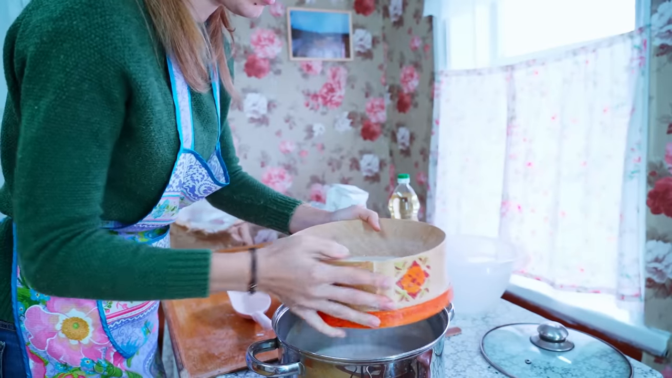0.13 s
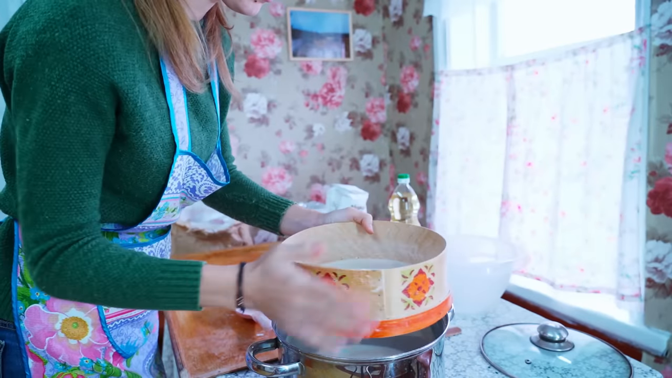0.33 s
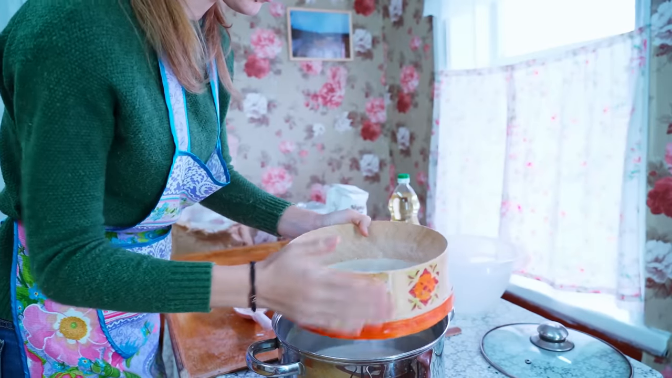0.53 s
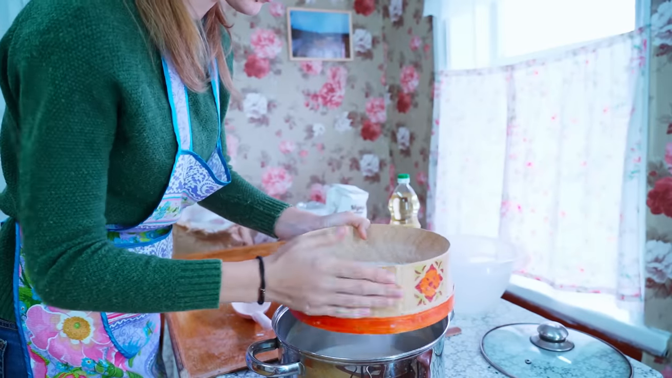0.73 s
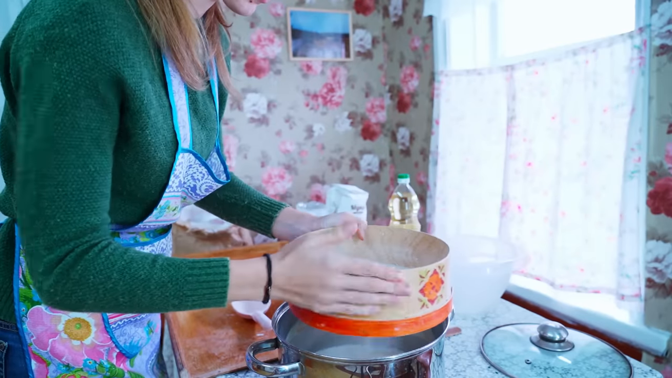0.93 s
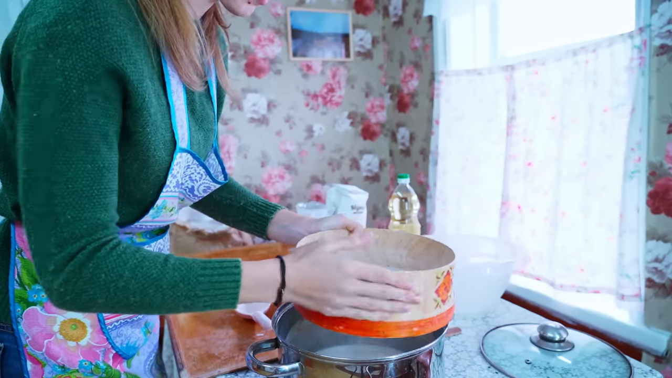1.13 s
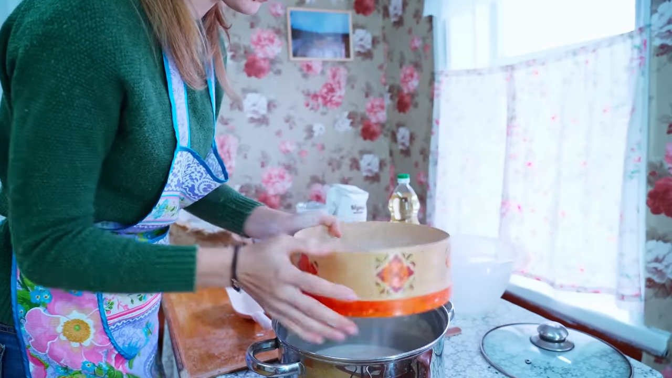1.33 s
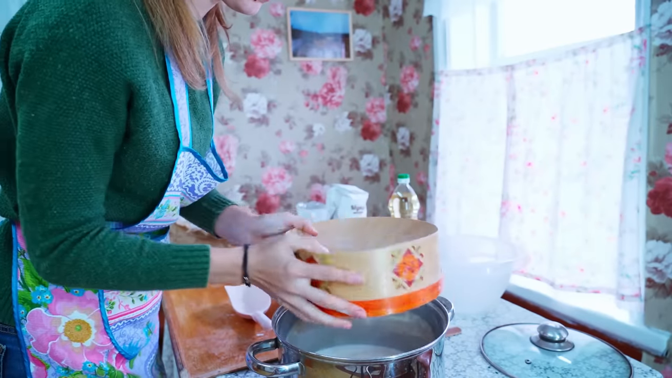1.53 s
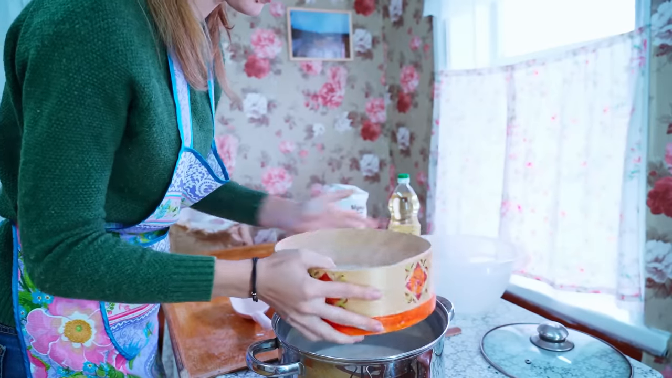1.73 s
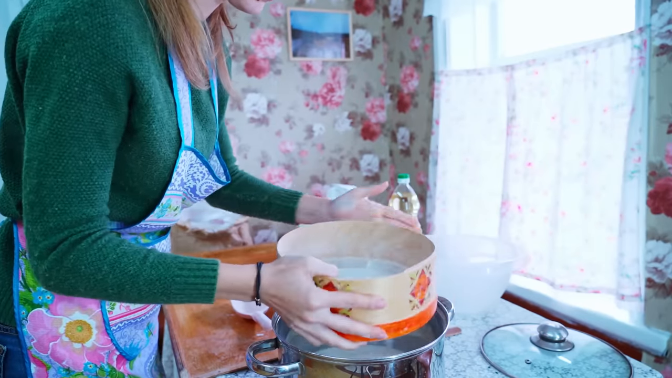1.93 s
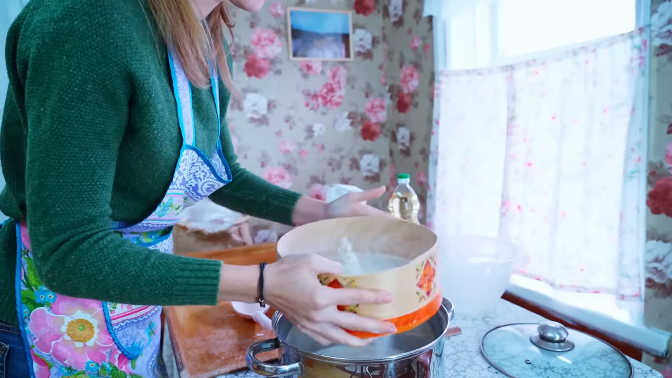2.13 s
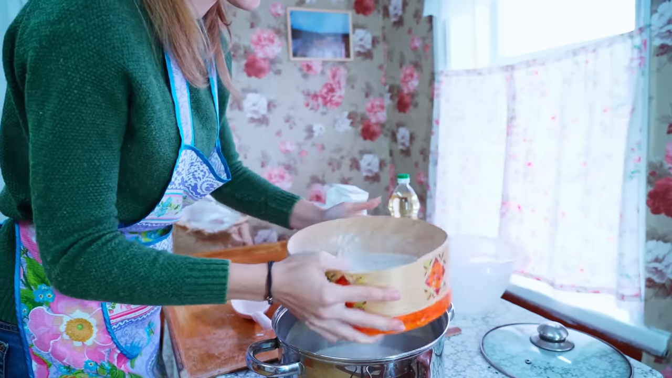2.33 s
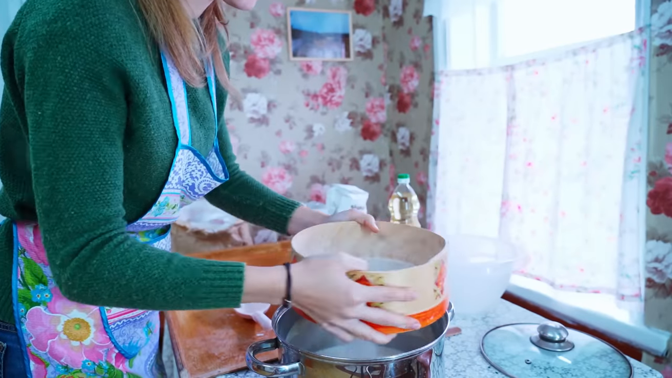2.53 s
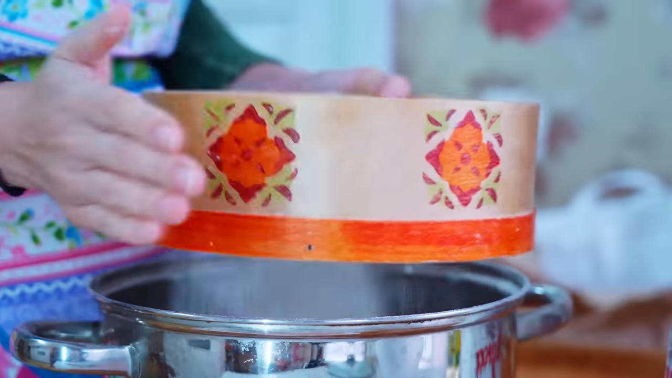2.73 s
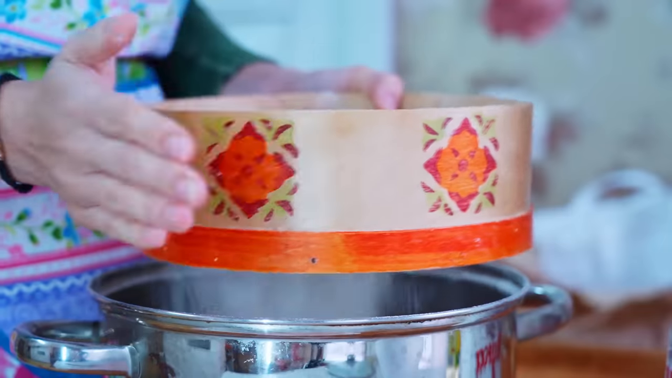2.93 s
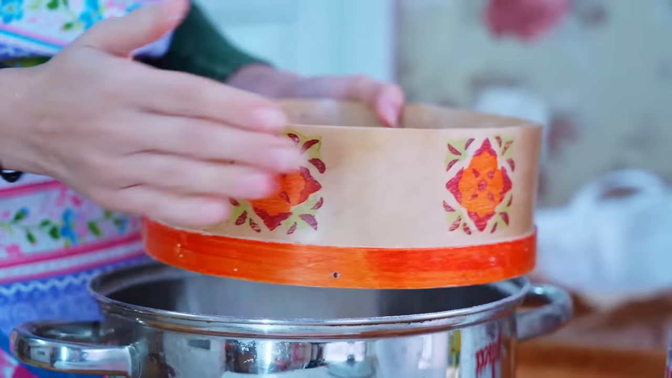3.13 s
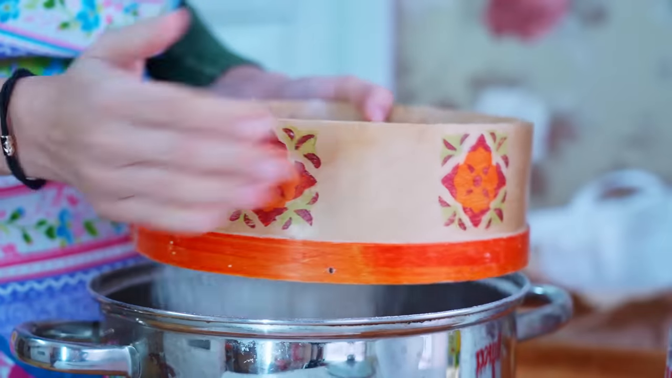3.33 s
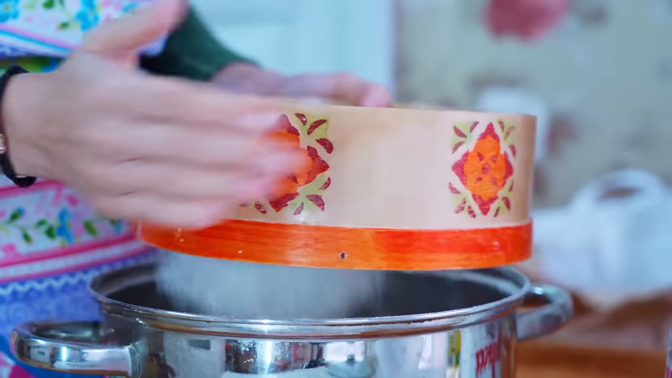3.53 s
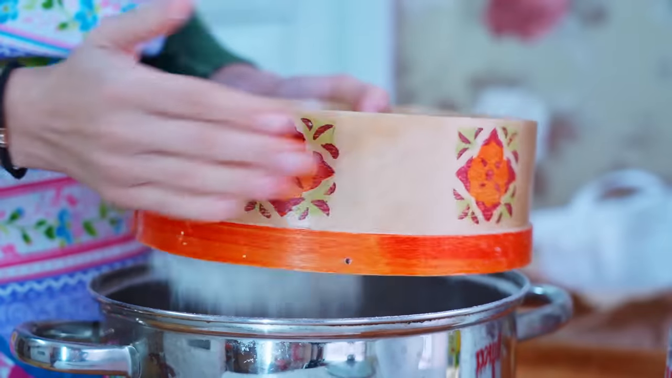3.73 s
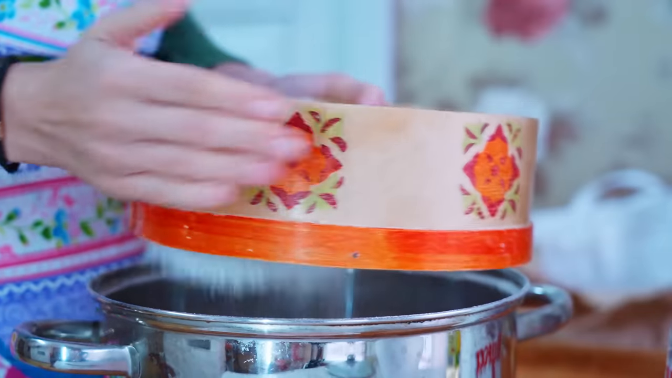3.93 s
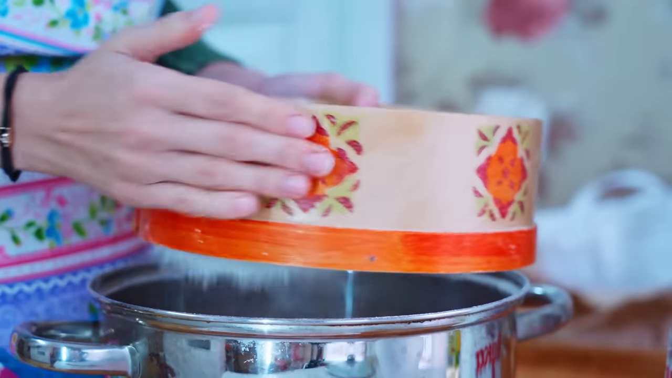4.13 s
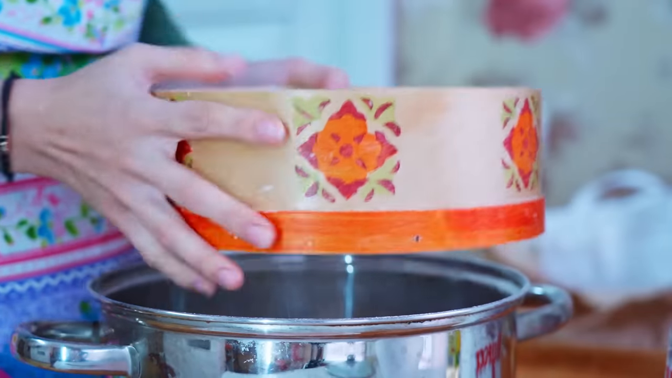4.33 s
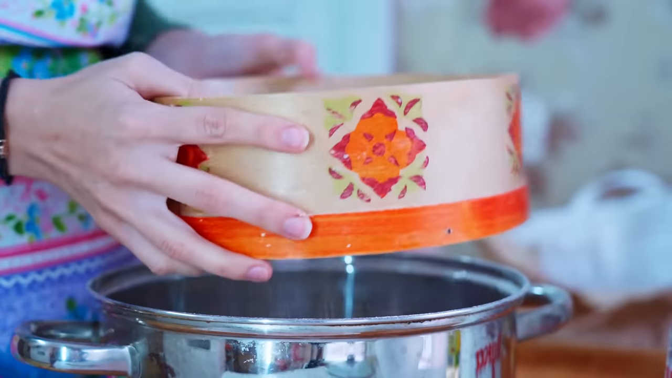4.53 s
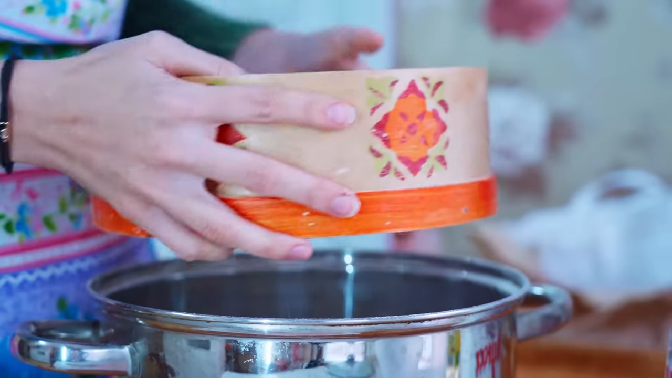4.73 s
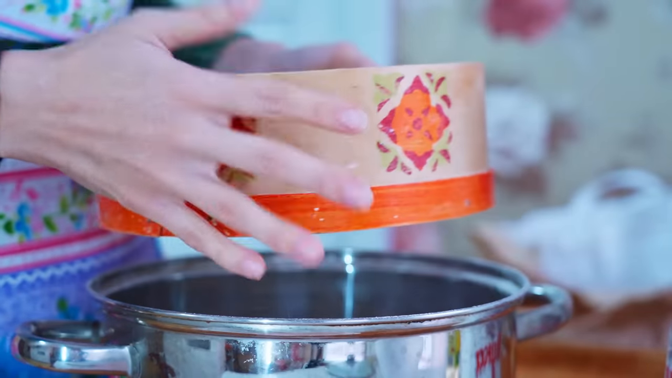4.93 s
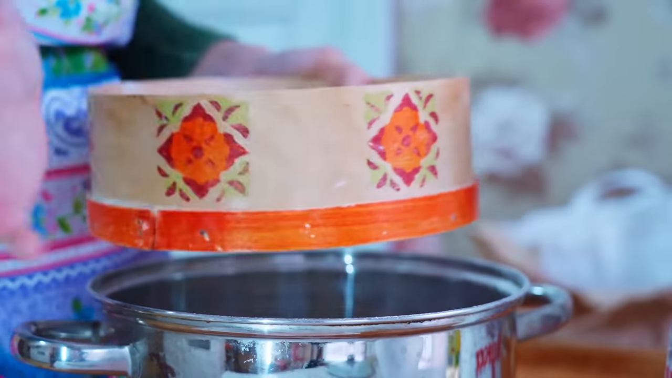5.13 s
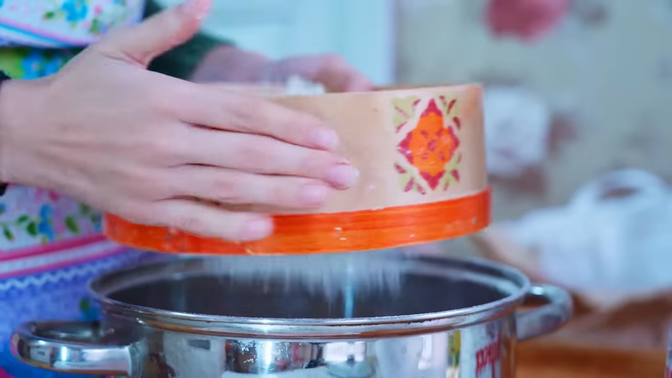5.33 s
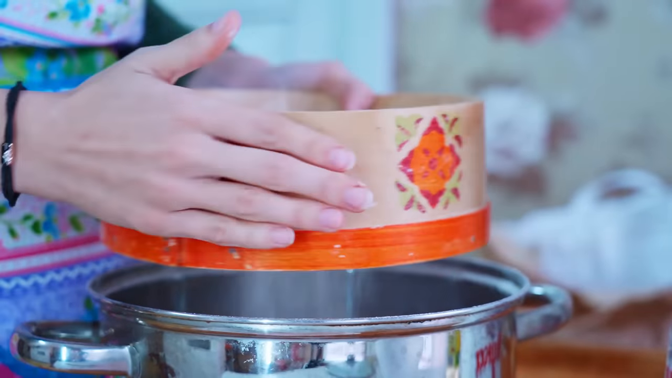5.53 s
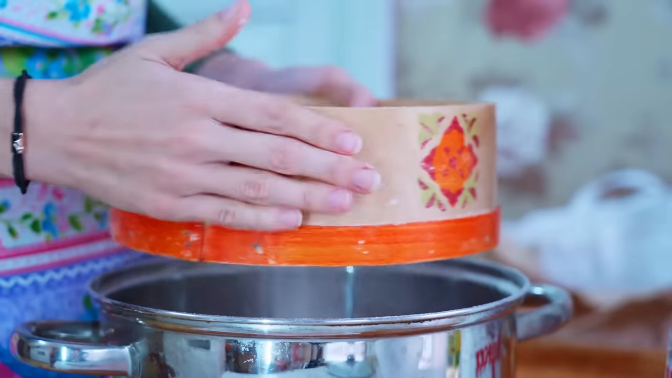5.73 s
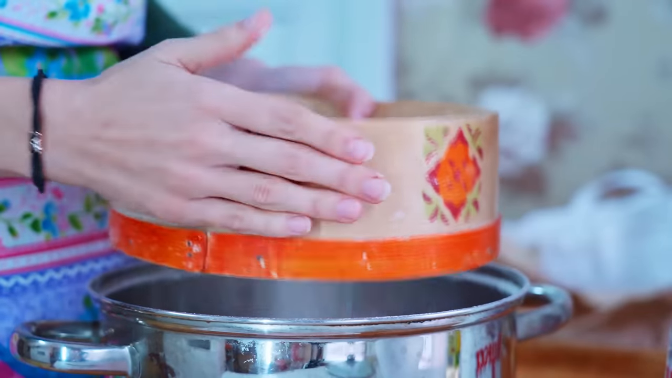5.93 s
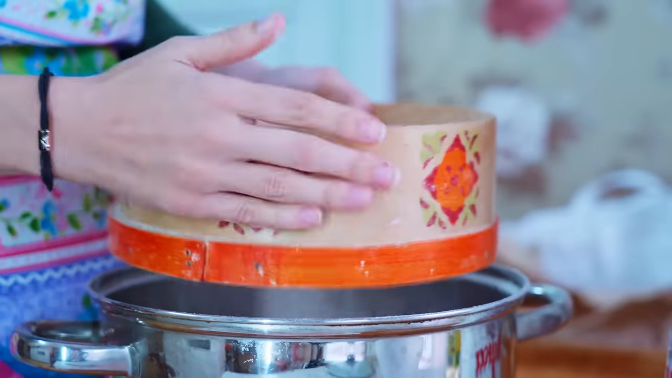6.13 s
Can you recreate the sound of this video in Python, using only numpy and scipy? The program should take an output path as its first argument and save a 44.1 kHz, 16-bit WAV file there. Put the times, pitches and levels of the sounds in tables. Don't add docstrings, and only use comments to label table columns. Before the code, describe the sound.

A small quiet kitchen, heard close in stereo over a low, steady room floor. At 0 s there is a very faint touch and a brush of skin on wood. From 0.4 to 1.15 s five brisk pats land on the sieve's wooden hoop, evenly spaced just under 0.2 s apart. Each is a clappy pop of air with a bright skin crack, a small thud of hoop and mesh, and a short room ring. From 1.4 to 1.75 s hands slide with a dry rub. Pats resume at 1.87 s, soft and smeared at first, then firm and regular until 4.1 s, with little ticks among them. A barely audible touch follows at 4.4 s; until 5.2 s come faint slides, fine flour hiss, soft mesh thumps and nail ticks. At 5.3 s one hard, crisp slap starts a last run of five pats, ending near 6.2 s.

```python
import sys
import numpy as np
from scipy import signal
from scipy.fft import rfft, irfft, next_fast_len
from scipy.io import wavfile

SR = 44100
rng = np.random.default_rng(int(sys.argv[2]) if len(sys.argv) > 2 else 0)


def makeup_ratio(level_db):
    decades = np.asarray(level_db, float) / 20
    return 10 ** decades


def digitize_waveform(pressure):
    field = np.atleast_2d(pressure).T
    bounded = np.clip(field, -1, 1)
    quanta = np.round(bounded * 32767).astype(np.int16)
    wavfile.write(sys.argv[1], SR, quanta)


N = 272538


# start in seconds, force in dB, landing time in ms,
# air pocket between the fingers in dB re force, hollow of the palm in dB re force.
PATS = [(0.0314, -34, 9.4, 7, -3), (0.4099, -17, 2.3, 4.5, -10), (0.5968, -15.5, 2.2, 2, -4.5),
        (0.77, -15, 3, 7, 2.5), (0.9505, -12.5, 3.7, 2.5, -4), (1.137, -14, 2.6, 3, -8),
        (1.8728, -22.5, 13, 3, -6), (2.0468, -18.5, 14, 1.5, -8), (2.2181, -15, 5.9, 1.5, -7),
        (2.3916, -15.5, 3.2, 1.5, -11), (2.636, -15, 2.5, 5.5, -18), (2.8414, -14.5, 0.8, 4.5, -14),
        (3.0454, -15, 5.7, 6, -4.5), (3.2674, -15, 3.5, 3, -8), (3.4676, -15.5, 9.3, 4.5, -9.5),
        (3.6812, -13, 7.4, 3.5, -3.5), (3.8903, -13, 6.9, 0.4, -1.5), (4.1084, -15.5, 4.8, 6, -6.5),
        (4.3743, -35, 2.9, 6, -8), (5.3055, -11, 1.3, 1.5, -7), (5.5363, -17.5, 6.1, 3.5, -9.5),
        (5.743, -15.5, 12.4, 1.5, -2.5), (5.959, -17, 7.7, 3, -6), (6.1673, -15, 4, 6, -3)]
PAT_S = np.array(PATS)[:, 0]


def slaps():
    near, around = np.zeros((2, N)), np.zeros(N)
    t = np.arange(1024) / SR
    click = 1. * (t == 0)
    shared, own = rng.standard_normal((2, len(PATS), 2, 1024))
    sizes = makeup_ratio(1.68 * rng.exponential(1, (len(PATS), 1024)))
    pockets = held(PAT_S)[:, 1] * (1 + 0.03 * rng.uniform(-1, 1, len(PATS)))
    for pat, pocket_hz, common, sides, size in zip(PATS, pockets, shared, own, sizes):
        start_s, landing_ms = pat[0], max(pat[2], .5)
        landing = (1 - np.exp(-t / 0.000078)) * np.exp(-(1000 * t / landing_ms) ** 2)
        contacts = landing * size * (common[0] + .6 * sides)
        add(near, start_s - .0003, sum(slap_parts(contacts, pat, pocket_hz)))
        power = sum(np.abs(rfft(part)) ** 2 for part in slap_parts(click, pat, pocket_hz))
        pulse = np.roll(irfft(np.sqrt(power)), 96)[:192]
        add(around, start_s - .0005, pulse)
    straight_db = -0.2
    return makeup_ratio(straight_db) * band_pass(near, 800, 16000), around


def slap_parts(contact, pat, pocket_hz):
    _, force_db, _, pocket_db, palm_db = pat
    pocket = ring(ring(contact, pocket_hz, .0021), pocket_hz, .0021)
    palm = ring(ring(contact, 1420, .006), 1420, .006)
    knock = band_pass(contact, 2600, 4800)
    airy_top = high_pass(contact, 8600)
    crack = band_pass(contact, 4600, 8000) - .13 * airy_top
    levels = force_db + np.array([pocket_db - 1.6, palm_db + 0.6, 1.1, -0.5])
    parts = []
    for db, part in zip(levels, [pocket, palm, knock, crack]):
        energy = np.sum(part ** 2, axis=-1, keepdims=True)
        parts.append(makeup_ratio(db) * part / np.sqrt(energy / 60))
    return parts


# from when in seconds, air pocket in Hz, mesh in dB re force,
# hoop in dB re force, hoop under the grip in Hz.
GRIPS = [(0, 2880, -1.5, 1.5, 300), (0.3, 2050, -3, -6, 480), (0.5, 2650, -8, -8, 480),
         (0.7, 2100, -12, -14, 400), (1.8, 2450, -10, -11, 400), (2.6, 2300, -14, -17, 410),
         (2.8, 2250, -22, -12, 630), (3.2, 2150, -17, -9, 490), (3.4, 2200, -26, -10, 600),
         (3.6, 2190, -24, -8.5, 415), (4.0, 2450, -17, -7, 597), (4.3, 2450, -7, -10, 380),
         (5.2, 2340, -17, -13, 410), (5.5, 2050, -10, -11, 420), (5.9, 2050, -11, -3, 415),
         (6.1, 2500, -16, -6, 436)]


def held(at_s):
    grips = np.array(GRIPS)
    return grips[np.searchsorted(grips[:, 0], at_s) - 1]


# start in seconds, level in dB.
DROPS = [
    (4.257, -39),
    (4.745, -50.5),
    (5.448, -38),
    (5.689, -37),
]
# frequency in Hz, level in dB, 60 dB decay in seconds.
MESH = [(147, -8, .14), (174, -3, .13), (205, -1.5, .07)]
HEAP = [(162, -1.5, .11)]
HOOP = [(270, -4, 0.04), (388, -11, 0.056), (605, -12, 0.019), (817, -5, 0.05)]


def thuds():
    s = PAT_S + .0004
    force_db = np.array(PATS)[:, 1]
    _, _, mesh_db, hoop_db, grip_hz = held(s).T
    mesh = struck(s, force_db + mesh_db, MESH) + struck(*np.transpose(DROPS), HEAP)
    hoop = struck(s, force_db + hoop_db, HOOP)
    click = 1. * (np.arange(8192) == 0)
    for at_s, db, hz in zip(s, force_db + hoop_db, grip_hz):
        add(hoop, at_s + 0.00214, makeup_ratio(db + 4.5) * ring(click, hz, t60=0.036))
    hoop = high_pass(hoop, 210)
    return band_pass(mesh + hoop, 90, 1100)


def struck(at_s, db, modes):
    out = np.zeros(N)
    for hz, mode_db, t60 in modes:
        clicks = np.zeros(N)
        strength_db = db + mode_db + rng.normal(0, 1.2, len(at_s))
        clicks[(at_s * SR).astype(int)] = -makeup_ratio(strength_db)
        out += ring(clicks, hz, t60)
    return out


def boom():
    hz, t60 = 76, .13
    s, force_db, landing_ms = np.array(PATS).T[:3]
    db = force_db - 77 + 3.3 * np.log2(landing_ms)
    return ring(struck(s - .002, db, [(hz, .1, t60)]), hz, t60)


# start in seconds, peak in dB, left over right in dB, centre in Hz.
TICKS = [(.0278, -37, -16, 5500), (1.3793, -46, -1.5, 7000), (3.026, -35, 2, 8000), (3.3965, -36, 14, 7000),
         (3.4536, -30.5, 11, 9500), (4.235, -37.5, 13, 7840), (4.262, -46, 6, 9000), (4.753, -41, -4, 2440),
         (4.764, -39.5, 1, 2500), (4.8434, -43, -3, 2500), (5.026, -34, 5.5, 6470), (5.134, -52, -1, 13000),
         (5.1637, -45, 8, 7500), (6.098, -45, 2, 7000)]


def ticks():
    out, t = np.zeros((2, N)), np.arange(512) / SR
    for (s, db, pan_db, hz), noise in zip(TICKS, rng.standard_normal((len(TICKS), 512))):
        fading = noise * np.exp(-t * hz / 3.9)
        tick = band_pass(fading, hz / 1.38, min(hz * 1.23, 19000))
        sides_db = db + np.array([[pan_db], [-pan_db]]) / 2
        add(out, s, tick / np.abs(tick).max() * makeup_ratio(sides_db))
    return out


# peak in seconds, peak in dB, 20 dB rise in seconds,
# 20 dB fall in seconds, fine hiss in dB re the rub.
STROKES = [(0.036, -40, .014, .17, -8), (0.172, -48, .16, .065, 0.3), (0.27, -60, .03, .08, 3),
           (0.69, -45, .008, .08, 12.5), (1.38, -50, .008, .5, -6), (1.49, -42, .05, .09, -2.5),
           (1.56, -52, .06, .15, -3), (1.685, -55, .08, .11, 4), (2.5, -50.5, .08, .22, -2.5),
           (4.43, -61, .03, .3, -3), (4.55, -52, .09, .07, 2.5), (4.76, -53, .015, .07, 3),
           (4.846, -56, .015, .07, 0.3), (4.915, -51, .065, .06, 0.5), (5.028, -53, .008, .08, 5)]
# frequency in Hz, level in dB per Hz.
RUB = [(700, -5.5), (1500, -6), (1900, 12.5), (2400, 7.5), (3000, -0.5), (4000, 10.5), (5000, 3.5),
       (8000, -34.5)]
HISS = [(3000, -12.5), (5000, -7), (7000, 1.5), (10000, -3.5), (14000, -9.5), (17000, -12)]


def slides():
    s, db, rise_s, fall_s, hiss_db = np.array(STROKES).T[..., None]
    t = np.arange(N) / SR
    from_peak = np.maximum((s - t) / rise_s, (t - s) / fall_s)
    power = makeup_ratio(2 * db - 40 * from_peak ** 1.3)
    rub = np.sqrt(power.sum(axis=0))
    hiss = np.sqrt((power * makeup_ratio(2 * hiss_db)).sum(axis=0))
    return rub * coloured(RUB, likeness=0.87) + hiss * coloured(HISS, likeness=1.7)


# frequency in Hz, 60 dB decay in seconds, echo in dB,
# left-right likeness from 0 to 1.
KITCHEN = [(60.3, 0.94, -20, 1), (160, 0.41, -9, 0.94), (431, 0.19, 5, 0.89), (1036, 0.31, -4.5, 0.39),
           (2500, .3, -5, 0.12), (4960, 0.25, -3, 0.058), (9000, 0.21, -0.6, 0.03), (15000, .18, 0.3, 0.02)]
# frequency in Hz, left over right in dB.
BALANCE_DB = [(60, -.7), (300, -1), (1000, -1.5), (2500, -2.5), (5000, -2.8), (9000, -4.5), (14000, -2.8)]


def kitchen(near, around, count=4):
    size = 22000
    t, padded = np.arange(size) / SR, next_fast_len(N + size)
    tails = 0
    for hz, noise in bands(count * size):
        decay_db = at_hz(KITCHEN, hz, axis=2) - 60 * t / at_hz(KITCHEN, hz)
        tails = tails + makeup_ratio(decay_db) * noise.reshape(2, count, size)
    tails = makeup_ratio(-29) * (1 - np.exp(-(t / 0.0005) ** 2)) * tails
    place = np.searchsorted(PAT_S - .005, np.arange(N) / SR) % count
    both = rfft(near, padded)
    for k in range(count):
        both = both + rfft(around * (place == k), padded) * rfft(tails[:, k], padded)
    lean_db = at_hz(BALANCE_DB, np.fft.rfftfreq(padded, 1 / SR) + 1) / 2
    return irfft(both * makeup_ratio([lean_db, -lean_db]), padded)[:, :N]


# frequency in Hz, level in dB per Hz.
FLOOR = [(15, -33), (25, 0), (61, 5.5), (117, -11.5), (170, -4), (223, -3.5), (560, -9), (1160, -14.5),
         (5000, -17.5), (7110, -17.5), (8590, -20.5), (14000, -23.5), (16000, -31)]
# time in seconds, level in dB.
STIR = [(0, 5.5), (1.5, 6.8), (2.6, 5), (4.3, 3.5), (4.5, 2.5), (5.25, 1.3), (5.4, 2.5), (6.18, 1.1)]


def room_floor():
    level_db = -59.5 + np.interp(np.arange(N) / SR, *np.transpose(STIR))
    return makeup_ratio(level_db) * coloured(FLOOR, likeness=0.83)


def coloured(spectrum, likeness):
    out = sum(makeup_ratio(at_hz(spectrum, hz)) * noise for hz, noise in bands(N, likeness))
    return out / np.sqrt(np.mean(out ** 2))


def bands(size, likeness=1.0):
    edges = 22 * 2 ** np.arange(0, 9.8, .5)
    white = rng.standard_normal((2, 2, size))
    for k, (low, high) in enumerate(zip(edges, edges[1:])):
        mid, side = band_pass(white[k % 2], low, high)
        hz = np.sqrt(low * high)
        alike = np.clip(likeness * at_hz(KITCHEN, hz, axis=3), 0, 1)
        yield hz, np.sqrt(1 + alike) * mid + np.sqrt(1 - alike) * side * [[1], [-1]]


def at_hz(points, hz, axis=1):
    points = np.array(points)
    return np.interp(np.log(hz), np.log(points[:, 0]), points[:, axis])


def ring(clicks, hz, t60):
    r, w = makeup_ratio(-60 / (t60 * SR)), 2 * np.pi * hz / SR
    return signal.lfilter([0, np.sin(w)], [1, -2 * r * np.cos(w), r * r], clicks + 1e-18)


def band_pass(x, low_hz, high_hz):
    return signal.sosfilt(signal.butter(2, [low_hz, high_hz], "band", fs=SR, output="sos"), x)


def high_pass(x, hz):
    return signal.sosfilt(signal.butter(2, hz, "high", fs=SR, output="sos"), x)


def add(out, s, sound):
    i = int(s * SR)
    out[..., i:i + sound.shape[-1]] += sound[..., :N - i]


def scene():
    near, around = slaps()
    body = thuds() + ticks()
    body_echo = makeup_ratio(-7) * body.mean(axis=0)
    return kitchen(near + body + boom(), around + body_echo) + slides() + room_floor()


def low_pass(x):
    return signal.sosfilt(signal.butter(12, 16970, fs=SR, output="sos"), x)


def record(dry):
    rounded = 1.185 * np.tanh(dry / 1.194)
    shelved = signal.sosfilt(signal.cheby2(14, 22, 15900, fs=SR, output="sos"), rounded)
    mix = signal.sosfilt(signal.cheby2(12, 50, 17000, fs=SR, output="sos"), shelved)
    return low_pass(mix)


dry = scene()
out = record(dry)
digitize_waveform(out)
```